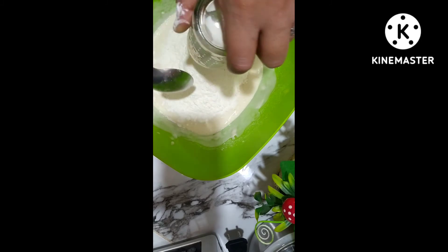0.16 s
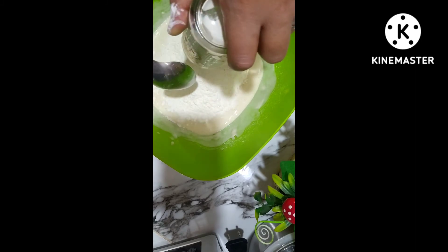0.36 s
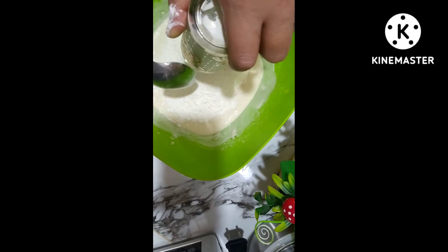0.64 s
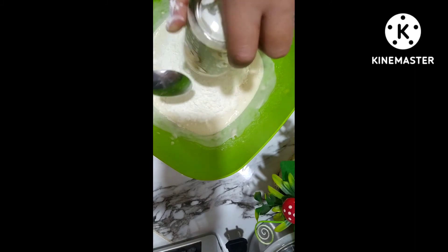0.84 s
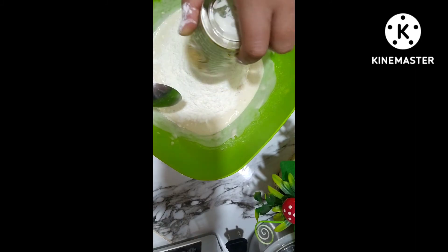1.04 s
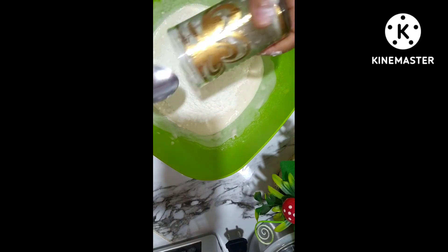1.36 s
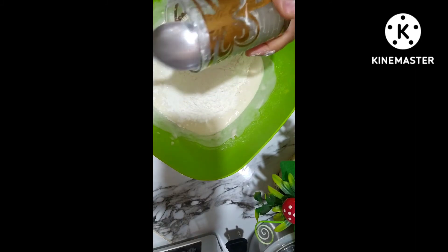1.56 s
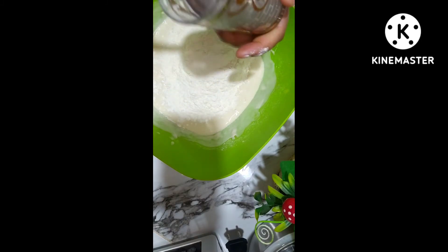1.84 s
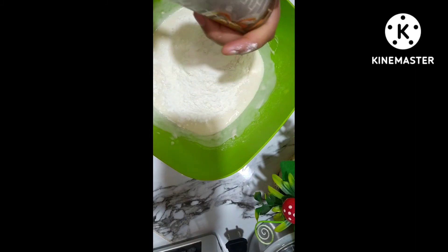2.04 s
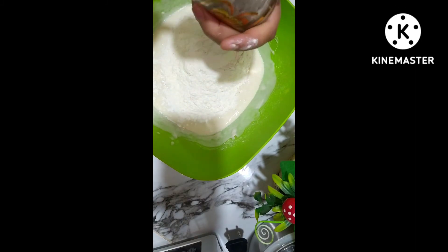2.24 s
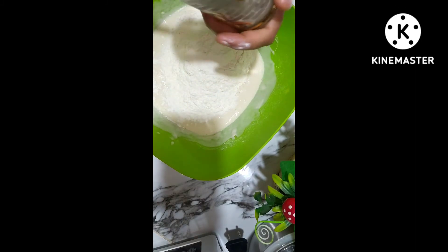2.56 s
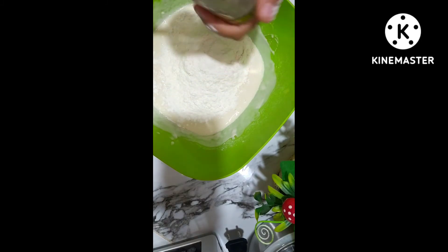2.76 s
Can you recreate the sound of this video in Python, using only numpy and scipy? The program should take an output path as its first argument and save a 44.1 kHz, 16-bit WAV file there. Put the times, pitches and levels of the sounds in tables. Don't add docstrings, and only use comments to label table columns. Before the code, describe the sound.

A metal spoon raps an upturned cup twice with bright, bouncing rings, pauses, then digs and scrapes inside it with shorter, damped clinks; close stereo microphone in a small kitchen with faint fridge hum.

```python
import sys
import numpy as np
from scipy import signal
from scipy.fft import rfft, irfft
from scipy.io import wavfile
from scipy.ndimage import uniform_filter1d

SR = 44100
rng = np.random.default_rng(int(sys.argv[2]) if len(sys.argv) > 2 else 0)


def digitize_waveform(pressure):
    field = np.atleast_2d(pressure).T
    bounded = np.clip(field, -1, 1)
    quanta = np.round(bounded * 32767).astype(np.int16)
    wavfile.write(sys.argv[1], SR, quanta)


def invert_db(x):
    u = np.asarray(x, float) / 20
    return 10 ** u


N = 127890


def evened(x):
    return x / np.sqrt(np.mean(x ** 2) + 1e-20)


def read(points, hz):
    f, value = np.transpose(points)
    return np.interp(np.log(hz + 1), np.log(f + 1), value)


def coloured(x, points):
    gain = invert_db(read(points, np.fft.rfftfreq(x.shape[-1], 1 / SR)))
    return irfft(rfft(x) * gain, x.shape[-1])


def clicks(s, size):
    x = np.zeros(N)
    np.add.at(x, np.round(np.asarray(s) * SR).astype(int), size)
    return x


def ring(x, hz, t60_s, rise_s):
    turn = np.exp(2j * np.pi * hz / SR)
    decay = 1000 ** (-1 / (t60_s * SR))
    rise = np.exp(-1 / (rise_s * SR))
    poles = np.convolve([1, -decay * turn], [1, -rise * turn])
    return np.sqrt(2) * signal.lfilter([1 - rise], poles, x + 1e-18)


def dying(x, t60_s):
    poles = np.convolve([1, -.92], [1, -1000 ** (-1 / (t60_s * SR))])
    return signal.lfilter([.08], poles, x + 1e-18)


def placed(x, pan_db):
    left_lag_samples = 15
    return np.array([np.roll(x, left_lag_samples) * invert_db(pan_db / 2), x * invert_db(-pan_db / 2)])


# frequency in Hz, density in dB per Hz.
AIR_SPECTRUM = [(30, -15), (100, -19.5), (260, -22), (700, -20), (2000, -32.5), (5000, -41.5),
                (8500, -38.5), (11000, -45.5), (13000, -63.5)]
# frequency in Hz, likeness 0 to 1.
AIR_LIKENESS = [(60, 0.49), (240, 0.28), (950, 0.11), (3770, 0.14), (15000, 0.03)]
# time in seconds, level in dB.
AIR_SWELL = [(0, -2.5), (.7, -0.5), (1.1, -2), (1.501, 0.5), (2.198, 0.5), (2.9, 1)]
AIR_DB = -60


def air():
    hz = np.fft.rfftfreq(N, 1 / SR)
    a, b = rfft(rng.standard_normal((2, N)))
    same = np.clip(read(AIR_LIKENESS, hz), 0, 1)
    z = np.array([a, same * a + np.sqrt(1 - same ** 2) * b]) * invert_db(read(AIR_SPECTRUM, hz))
    level = np.std(irfft(z.mean(0) * (hz > 250), N))
    swell_db = np.interp(np.arange(N) / SR, *np.transpose(AIR_SWELL))
    return irfft(z, N) / level * invert_db(AIR_DB + swell_db)


# frequency in Hz, level in dB rms.
HUM = [(49, -57), (97, -69.5), (147, -70.5), (197, -63), (415, -71), (623, -71), (680, -73), (830, -69.5)]
HUM_WAVER_DB = 1


def fridge():
    t, out = np.arange(N) / SR, np.zeros((2, N))
    for hz, db in HUM:
        drift = rng.standard_normal((3, 30))
        slow = [np.interp(t, np.linspace(0, N / SR, 30), d) for d in drift]
        phase = 2 * np.pi * hz * t + .5 * slow[0] + np.array([0.14 * slow[1], 0 * t])
        out += np.sqrt(2) * invert_db(db + HUM_WAVER_DB * slow[2]) * np.sin(phase)
    return out


# frequency in Hz, T60 in seconds.
ECHO_T60 = [(300, 0.66), (1500, 0.27), (4000, 0.64), (9000, 0.33), (15000, 0.6)]


def kitchen_echo(x):
    taps = np.zeros((2, SR // 2))
    at = np.arange(200, SR // 2 - 20, 20) + rng.integers(0, 20, (2, (SR // 2 - 201) // 20))
    np.put_along_axis(taps, at, rng.choice([-1., 1.], at.shape), 1)
    hz, t, z = signal.stft(taps, SR, nperseg=256)
    t60_s = np.maximum(read(ECHO_T60, hz), .05)[:, None]
    tail = signal.istft(z * invert_db(-60 * t / t60_s), SR, nperseg=256)[1]
    return signal.fftconvolve(x, tail / np.linalg.norm(tail[0]), axes=1)[:, :N]


# time in seconds, level in dB.
THUMPS = [
    (0.249, -42),
    (0.292, -50),
    (.395, -47.5),
]
THUMP_HZ, THUMP_T60_S, THUMP_RISE_S = 22, 0.34, 0.0035


def bowl_thumps():
    s, db = np.transpose(THUMPS)
    return ring(clicks(s, invert_db(db)), THUMP_HZ, THUMP_T60_S, THUMP_RISE_S).imag


# time in seconds, level in dB, pitch in Hz, left-right in dB.
CLANKS = [(.243, -31, 1754, 23), (0.251, -23.5, 1480, 6.5), (0.392, -49, 980, -1.5),
          (1.466, -33.5, 870, -7.5), (1.908, -36.5, 1200, 10), (1.906, -31.5, 2407, -2),
          (1.4, -44.5, 880, -9), (1.7, -38.5, 2320, -7), (2.129, -34.5, 910, -6.5),
          (2.128, -17.5, 2595, -1.5), (2.129, -24, 2150, -1), (.525, -44.5, 1010, 3),
          (.53, -41.5, 1800, 1.5), (2.4385, -40.5, 3300, -3), (2.503, -38.5, 3000, -1.5),
          (2.563, -40, 3000, 1), (1.906, -32.5, 5890, -2), (2.2, -45.5, 1780, 3), (2.281, -32.5, 2000, -3),
          (2.505, -40, 1140, -7), (2.56, -32, 966, -4.5), (2.636, -24, 935, -7.5), (2.637, -24, 2446, -5),
          (2.821, -34.5, 945, -0.5)]
CLANK_T60_S, CLANK_RISE_S = 0.018, 0.00068
CAVITY_HZ, CAVITY_T60_S, CAVITY_RISE_S, CAVITY_DB = 851.5, 0.21, .003, -15
CAVITY_UNDER_HZ = 1300


def clanks_and_cavity():
    out = np.zeros((2, N))
    for s, db, hz, pan_db in CLANKS:
        hit = clicks([s], invert_db(db))
        clank = 2 * ring(hit, hz, CLANK_T60_S, CLANK_RISE_S)
        if hz < CAVITY_UNDER_HZ:
            clank = clank + invert_db(CAVITY_DB) * ring(hit, CAVITY_HZ, CAVITY_T60_S, CAVITY_RISE_S)
        out += placed(clank.imag, pan_db)
    return out


# start in seconds, length in seconds, from Hz, to Hz, level in dB.
MOUTH = [
    (1.655, .04, 2350, 2440, -50),
    (2.135, .14, 2020, 2330, -47.5),
    (2.639, 0.099, 2300, 2455, -50),
]
MOUTH_WIDTH_HZ = 86


def mouth():
    t, out = np.arange(N) / SR, np.zeros((2, N))
    r = np.exp(-np.pi * MOUTH_WIDTH_HZ / SR)
    for s, length_s, from_hz, to_hz, db in MOUTH:
        u = np.clip((t - s) / length_s, 0, 1)
        a, b = rng.standard_normal((2, 2, N))
        turn = np.exp(2j * np.pi * np.cumsum(from_hz + (to_hz - from_hz) * u) / SR)
        narrow = signal.lfilter([1], [1, -2 * r, r * r], a + 1j * b)
        out += invert_db(db) * np.sin(np.pi * u ** 0.37) ** 2 * evened((turn * narrow).real)
    return out


# start in seconds, length in seconds, level in dB.
SCRAPES = [(1.40, .06, -71), (1.616, 0.05, -45.5), (1.653, 0.09, -43), (1.72, 0.11, -47.5),
           (1.782, 0.069, -47.5), (1.895, .015, -46), (1.925, 0.064, -50), (2.072, 0.077, -50),
           (2.14, 0.13, -44.5), (2.436, 0.06, -38), (2.546, 0.034, -41), (2.613, 0.034, -37.5)]
SLIPS_PER_S, SLIP_SPREAD_DB = 600, 2.5


def drag():
    t, press = np.arange(N) / SR, np.zeros(N)
    for s, length_s, db in SCRAPES:
        u = np.clip((t - s) / length_s, 0, 1)
        press += invert_db(db) * np.sin(np.pi * u ** 0.33) ** 2
    size_db = SLIP_SPREAD_DB * np.minimum(rng.exponential(1, N), 3)
    slips = (rng.random(N) < SLIPS_PER_S / SR) * invert_db(size_db)
    return press, slips * rng.choice([-1., 1.], N)


SHAKES_PER_S = 30


def shaking(shake):
    knots = rng.standard_normal((4, 90))
    at = np.arange(N) / SR * SHAKES_PER_S
    a, b, c, d = (np.interp(at, np.arange(knots.shape[1]), k) for k in knots)
    return 1 + shake * np.array([a + 1j * b, c + 1j * d])


SPOT_DB = 3.5


def body(pitches_hz, modes, s, db, rubbing, grip, rise_s, shake):
    spot_db = SPOT_DB * shake * rng.standard_normal((len(s), len(modes)))
    out = np.zeros((2, N))
    for k, (level_db, t60_s, pan_db, lead_rad) in enumerate(modes):
        drive = clicks(s, invert_db(db + level_db + spot_db[:, k])) + invert_db(level_db) * rubbing
        mode = placed(ring(drive, pitches_hz[k], grip * t60_s, rise_s), pan_db)
        left_lead = np.exp([[1j * lead_rad], [0]])
        out += (shaking(shake) * left_lead * mode).imag
    return out


PARTIALS_DB, PARTIAL_WIDTH_HZ = 7, 40


def crowded(x):
    spectrum = rfft(x)
    width = round(PARTIAL_WIDTH_HZ * N / SR)
    peaks = evened(uniform_filter1d(rng.standard_normal(spectrum.shape[-1]), size=width))
    return evened(irfft(spectrum * invert_db(PARTIALS_DB * peaks), N))


RIM_HZ = [6520, 6563, 6616, 6478]
SPOON_HZ = [7644, 7942, 8185, 8236, 8336, 8430, 8700, 9480, 10620, 11340, 11680, 15600]
# level in dB, T60 in seconds, left-right in dB, left lead in rad.
RIM = [(-2, 0.33, -8.5, 2.6), (-12, 0.23, 3, 1), (-15, .22, -2.5, 1), (-9, 0.14, 1.5, -0.74)]
SPOON = [(-7.5, 0.15, -7.5, -1.2), (-18, 0.32, -2.5, 0.18), (-9.5, 0.2, -4, .3), (-8, 0.36, -8.5, -.6),
         (-5.5, 0.25, -12, -1.3), (-14, 0.062, -9.5, .3), (-4, 0.068, -5.5, .3), (-23, .12, 4, .3),
         (-13, 0.201, 5.5, .6), (-21, 0.3, 4.5, .3), (-19.5, 0.2, -0.5, .6), (-23, .1, -3, .3)]
# frequency in Hz, density in dB per Hz.
CRACK = [(400, -23), (2500, -2.5), (4200, -9), (6000, -9.5), (8500, -2.5), (11800, -12.5), (14000, -29),
         (15600, -23.5), (16600, -43.5)]
CLATTER = [(500, -27.5), (2500, -3.5), (3400, -8.5), (4800, -13), (6800, -13), (8500, -2.5), (11700, -11.5),
           (13000, -36)]
CRACK_T60_S, CRACK_DB, CRACK_PAN_DB = 0.023, -8.5, -6.5
CLATTER_T60_S, CLATTER_DB = 0.25, -11.5
SCRAPE_HISS_DB, SCRAPE_PING_DB, SCRAPE_WALL_DB, SCRAPE_RIM_DB = -5, -9.5, -26, -38
WALL_RISE_S, RISE_S, SHAKE = 0.0011, 0.00055, 1


def blows(rows, wall_hz, wall, grip, press, slips, wall_shake):
    s, crack_db, wall_db, rim_db, ping_db = np.transpose(rows)
    rub = press * slips
    out = body(wall_hz, wall, s, wall_db, rub * invert_db(SCRAPE_WALL_DB), 1, WALL_RISE_S, wall_shake)
    out += body(RIM_HZ, RIM, s, rim_db, rub * invert_db(SCRAPE_RIM_DB), np.sqrt(grip), RISE_S, SHAKE)
    out += body(SPOON_HZ, SPOON, s, ping_db, rub * invert_db(SCRAPE_PING_DB), grip, RISE_S, SHAKE)
    force = clicks(s, invert_db(crack_db + CRACK_DB))
    crack = dying(force, CRACK_T60_S) * evened(coloured(rng.standard_normal(N), CRACK))
    b, c = crowded(coloured(rng.standard_normal((2, N)), CLATTER))
    grit = crowded(coloured(evened(slips) + rng.standard_normal(N), CLATTER))
    out += placed(crack + invert_db(SCRAPE_HISS_DB) * press * grit, CRACK_PAN_DB)
    clatter = dying(force, CLATTER_T60_S * np.sqrt(grip)) * np.array([b + .5 * c, c])
    return out + invert_db(CLATTER_DB) * clatter


# time in seconds, crack in dB, wall ring in dB, rim ring in dB, spoon ping in dB.
DIGS = [(1.6161, -46, -60, -70, -51), (1.66, -45, -56, -64, -52), (1.7228, -54, -68, -65, -49.5),
        (1.7313, -52, -70, -68, -47), (1.7473, -44, -61, -70, -41), (1.7947, -42, -60.5, -65, -46),
        (2.064, -47, -50, -73, -51), (2.4965, -35, -52, -64, -44), (2.622, -36.5, -48, -65, -43),
        (1.7868, -39.5, -54.5, -68, -40), (1.8692, -43, -56, -68, -52), (1.9056, -21, -44.5, -39, -23.5),
        (1.9994, -35, -55.5, -68, -45), (2.0552, -75, -53, -77, -49), (2.0896, -52, -49, -85, -61),
        (2.1286, -12, -35.5, -42, -26), (2.1745, -49, -79, -58, -52), (2.2024, -44, -68, -63, -47.5),
        (2.2493, -41, -67, -54, -43.5), (2.2812, -25, -30, -55.5, -47), (2.3351, -19.5, -18.5, -52, -35.5),
        (2.4379, -27.5, -41, -47.5, -35), (2.5027, -26.5, -38.5, -49, -30.5),
        (2.5596, -13.5, -36.5, -33, -23), (2.6339, -13.5, -39, -55, -27), (2.6384, -14.5, -68, -49, -28.5),
        (2.82, -31, -70, -88, -72)]
TILTED_HZ = [2682, 2705, 2655]
# level in dB, T60 in seconds, left-right in dB, left lead in rad.
TILTED_WALL = [(0.5, 0.27, 3.5, -0.48), (-14, 0.26, -2, 0.96), (-31, 0.1, -3, 0.58)]


def digs_inside():
    press, slips = drag()
    return blows(DIGS, TILTED_HZ, TILTED_WALL, 0.18, press, slips, wall_shake=.22)


# time in seconds, crack in dB, wall ring in dB, rim ring in dB, spoon ping in dB.
TAPS = [
    (.2414, -7, -20.5, -24, -20),
    (.2504, -14, -36.5, -40.5, -24.5),
    (.2624, -16.5, -41.5, -36, -24.5),
    (.2694, -22.5, -24, -26.5, -26.5),
    (.387, -7.5, -22, -17, -20.5),
    (.3954, -21, -17.5, -23, -31.5),
    (.4014, -21.5, -27.5, -32.5, -23.5),
    (.525, -23, -32.5, -51, -45.5),
    (1.3947, -26, -37, -48, -35.5),
    (1.4631, -18.5, -30, -45.5, -36.5),
]
WALL_HZ = [2668, 2686, 2703, 2575]
# level in dB, T60 in seconds, left-right in dB, left lead in rad.
WALL = [(-5, 0.3, -1, 2.0), (-3.5, 0.4, -1.5, 0.36), (-7.5, 0.36, 2, 1.5), (-22.5, 0.4, -2, .3)]


def taps_outside():
    still = np.zeros(N)
    return blows(TAPS, WALL_HZ, WALL, 0.37, still, still, wall_shake=.6)


def spoon_on_cup():
    return bowl_thumps() + clanks_and_cavity() + mouth() + digs_inside() + taps_outside()


ECHO_DB = -7.5


def scene():
    cup = spoon_on_cup()
    return air() + fridge() + invert_db(ECHO_DB) * kitchen_echo(cup) + cup


def top_cut(x):
    return signal.sosfilt(signal.butter(12, 17140, fs=SR, output="sos"), x)


HOLE_DB, HOLE_CHANCE_DB, VALLEY_DB = -10.5, 5, -8
GAP_HZ, GAP_TOP_HZ, GAP_MASK_DB = 11900, 15200, -28
ATTACK_DB, WHOLE_UNDER_HZ = 14, 3000


def record(dry):
    hz, _, z = signal.stft(dry, SR, nperseg=1024, noverlap=512, nfft=1024)
    power = (abs(z[:, :512]) ** 2).sum(0).reshape(64, 8, -1).mean(1)
    centre = hz[4:512:8, None]
    loudest = power[4:].max(0)
    near = uniform_filter1d(power, size=15, axis=0)
    valley_db = np.clip(10 * np.log10(power / (near + 1e-30) + 1e-30), VALLEY_DB, 0)
    chance = evened(uniform_filter1d(rng.standard_normal(power.shape), size=9, axis=1))
    stands_out = valley_db + HOLE_CHANCE_DB * chance > HOLE_DB
    in_gap = (centre > GAP_HZ) & (centre < GAP_TOP_HZ)
    strong = np.where(in_gap, power > loudest * invert_db(GAP_MASK_DB) ** 2, stands_out)
    attack = loudest > np.roll(loudest, 1) * invert_db(ATTACK_DB) ** 2
    keep = strong | (centre < WHOLE_UNDER_HZ) | attack
    z[:, :512] *= np.repeat(keep, 8, axis=0)
    mix = signal.istft(z, SR, nperseg=1024, noverlap=512)[1][:, :N]
    return top_cut(mix)


dry = scene()
out = record(dry)
digitize_waveform(out)
```